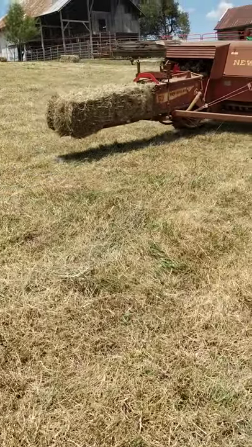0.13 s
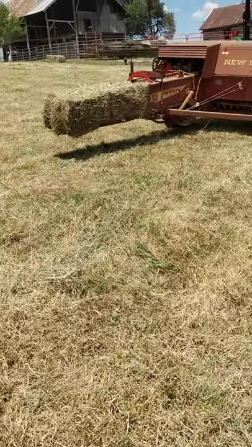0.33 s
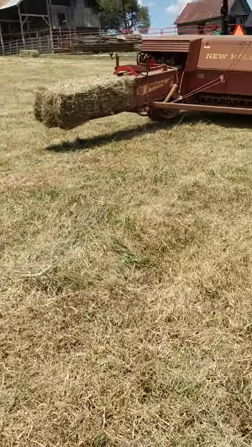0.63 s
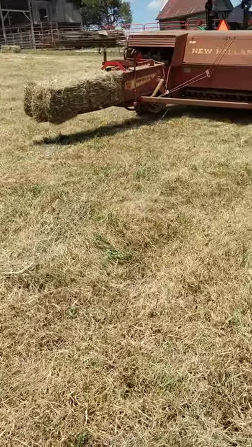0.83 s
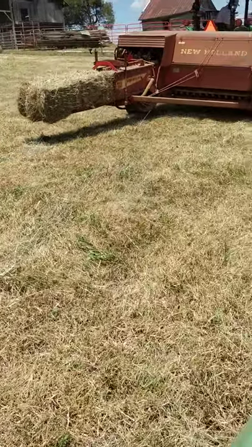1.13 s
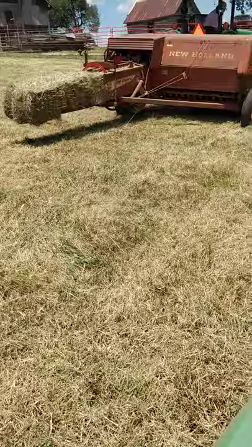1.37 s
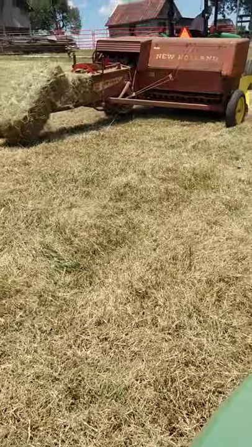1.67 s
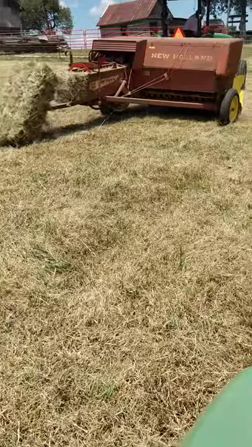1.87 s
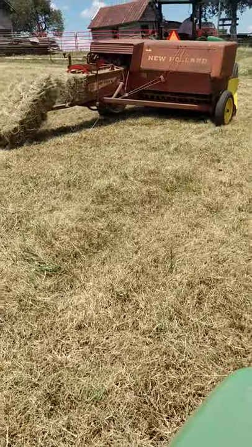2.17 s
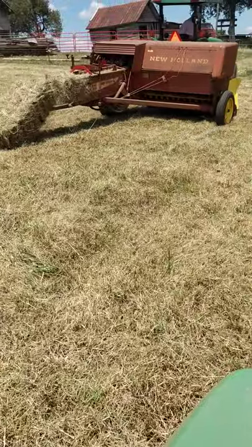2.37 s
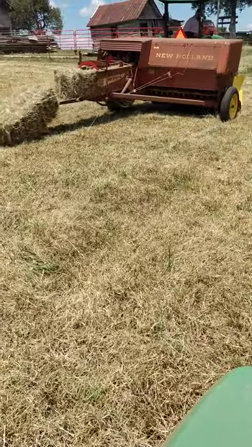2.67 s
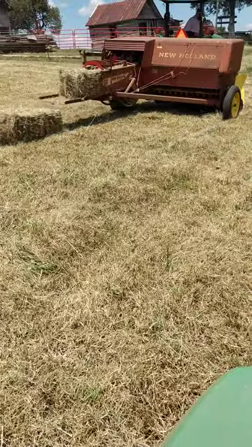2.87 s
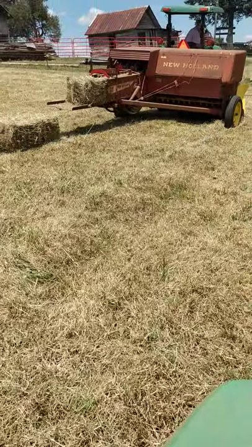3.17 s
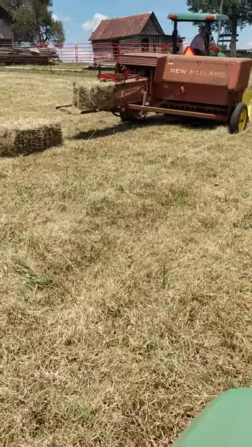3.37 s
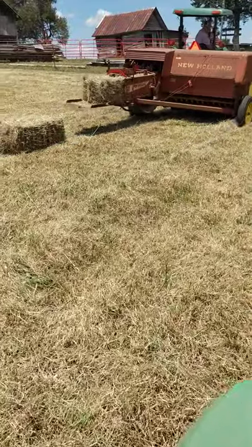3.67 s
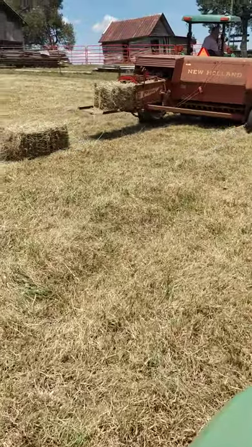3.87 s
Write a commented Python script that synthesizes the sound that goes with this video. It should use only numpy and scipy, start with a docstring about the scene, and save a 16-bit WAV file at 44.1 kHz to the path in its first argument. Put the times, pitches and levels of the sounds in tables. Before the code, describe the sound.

Farm machinery hums and rumbles steadily outdoors as a tractor runs a baler. Nearby metal parts jingle irregularly on the right, growing louder toward the end, when a panel thumps and a low throb swells.

```python
"""A hay field, where a tractor and baler drone: turning shafts hum and the bodywork rumbles.
Close on the right, each jolt makes loose metal parts click together and ring. A baler part pings,
a few hollow knocks sound, a body panel thumps and bounces, and a low throb swells at the end.
Behind it all lies a soft wash of distant machinery and air."""
import sys
import numpy as np
from scipy import signal
from scipy.fft import rfft, irfft
from scipy.io import wavfile
from scipy.ndimage import uniform_filter1d

SR = 44100
rng = np.random.default_rng(int(sys.argv[2]) if len(sys.argv) > 2 else 0)


def to_wav(s):
    """Save 16-bit WAV."""
    ch = np.atleast_2d(s).T  # columns
    pcm = np.round(np.clip(ch, -1, 1) * 32767)  # PCM
    wavfile.write(sys.argv[1], SR, pcm.astype(np.int16))


N = 176400  # 4 seconds

# Tones of the slow and the fast shaft: multiple_of_turn_rate, level_db
SLOW_SHAFT_TONES = [(3, -53.5), (4, -47), (9, -50), (12, -49)]
FAST_SHAFT_TONES = [(4, -49.5), (5, -48.5)]
# Which side those tones lean to: pitch_hz, left_minus_right_db
ENGINE_SIDE = [(60, 4.5), (110, -9), (200, -23.5)]
# How hard the bodywork shakes: time_s, relative_level_db
SHAKE_LEVELS = [(0, -32), (.12, -28), (.33, -32), (.56, -25), (.7, -28), (.97, -37), (1.04, -28),
                (1.17, -34), (1.45, -33), (1.63, -26), (1.78, -45), (2.62, -47), (2.7, -26), (2.77, -43),
                (3.7, -44), (3.78, -36), (4, -46)]
# Where the bodywork rings: pitch_hz, width_hz, relative_level_db
BODY_TONES = [(146.8, 78, -5.5), (201.5, 51, -0.5), (281.6, 79, -12.5)]
# Jolts that rattle the metal: start_s, strength_db, main_pitch_hz, fade_s, spread_octaves
JOLTS = [(0.059, -33, 5350, 0.015, 0.89), (0.086, -34.5, 4490, 0.024, 0.72),
         (0.176, -37.5, 6600, 0.021, 1.6), (0.3914, -31, 3816, 0.018, 1.5), (0.4133, -28, 3630, 0.024, 1.2),
         (0.552, -23.5, 9100, 0.018, 1.07), (1.409, -30, 4730, 0.06, 1.1), (1.42, -24.5, 8400, 0.018, 1.9),
         (1.505, -32.5, 8060, 0.0049, 1.2), (1.622, -37, 4475, 0.0093, 1.7),
         (1.721, -36.5, 5480, 0.02, 0.33), (1.816, -32.5, 4884, 0.023, 1.2),
         (1.9035, -35.5, 3600, 0.031, 1.3), (2.139, -33.5, 3594, 0.024, 1.15),
         (2.189, -34.5, 5050, 0.016, 1.5), (2.2953, -25, 5610, 0.018, 0.8),
         (2.3308, -13.5, 6890, 0.033, 1.27), (2.444, -22.5, 5760, 0.032, 1.21),
         (2.5388, -33.5, 4826, 0.069, 0.99), (2.6785, -23.5, 4944, 0.03, 0.83),
         (2.7329, -40, 4400, 0.0075, 0.65), (2.8, -31.5, 2650, 0.012, 1.3),
         (3.0408, -34.5, 6580, 0.025, 0.95), (3.1657, -27.5, 8260, 0.024, 0.51),
         (3.2544, -10, 8440, 0.012, 1.62), (3.302, -23.5, 5800, 0.015, 0.88),
         (3.3607, -17.5, 4150, 0.012, 1.7), (3.483, -31, 7010, 0.12, 1.7), (3.519, -22, 9360, 0.018, 1.7),
         (3.5613, -14, 4440, 0.019, 1.6), (3.5913, -12.5, 3300, 0.017, 1.3),
         (3.6605, -22.5, 2460, 0.02, 1.64), (3.738, -20, 2585, 0.018, 0.76),
         (3.776, -30.5, 5280, 0.012, 1.3), (3.8346, -29.5, 7600, 0.027, 1.44),
         (3.866, -36.5, 2444, 0.0094, 0.85), (3.9092, -31, 3470, 0.031, 1.7),
         (3.958, -29, 4960, 0.03, 0.85)]
# Main tones of the loose metal: pitch_hz, relative_level_db
METAL_TONES = [(2340, 0), (3390, -15), (4440, 2.5), (4840, -0.5), (6100, 3), (9640, 5.5)]
# How much weaker the rattle is on the left: pitch_hz, left_minus_right_db
RATTLE_SIDE = [(1000, -20), (4000, -18.5), (14000, -26.5)]
# Pings of the baler part: start_s, relative_level_db
PING_HITS = [(1.531, -40.5), (1.7982, -42), (1.9315, -30), (2.0652, -44), (2.4536, -33), (2.584, -32.5),
             (2.7245, -37), (2.8482, -35.5), (2.98, -32), (3.9877, -34)]
# The two tones of a ping: rough_pitch_hz, relative_level_db, ring_s
PING_TONES = [(1742, -8.5, 0.22), (1761, 1, 0.11)]
# Hollow knocks, and at 3.27 s the low thud of the panel hit: start_s, level_db, pitch_hz
KNOCK_HITS = [(0.567, -41, 985), (0.819, -45, 980), (1.348, -43.5, 1094), (2.4, -42.5, 1384),
              (3.27, -17, 330), (3.505, -34.5, 434), (3.75, -40, 777)]
# The hit on the panel and its bounces: start_s, level_db, ring_s
PANEL_HITS = [(3.245, -20, 0.36), (3.268, -18, 0.27), (3.312, -24.5, 0.22), (3.366, -26, 0.13)]
# Tone colour of the panel: pitch_hz, relative_level_db
PANEL_COLOUR = [(100, -55), (145, -13), (299, -6), (618, -17.5), (744, -12.5), (1190, -22), (3000, -21.5),
                (5000, -43)]
# Course of the throb: time_s, pulse_rate_hz, level_db
THROB_COURSE = [(3.52, 23.13, -37), (3.68, 29.3, -29.5), (3.8, 33.74, -16), (3.9, 33.1, -27.5),
                (4, 34, -29)]
# Tones of the throb: multiple_of_pulse_rate, relative_level_db
THROB_TONES = [(2, 8.5), (3, 4.5), (4, -0.5)]
# Tone colour of the distant wash: pitch_hz, relative_level_db
WASH_COLOUR = [(15, -42), (25, -14.5), (212, -5.5), (373, -14), (800, -21.5), (1260, -23), (1650, -24.5),
               (11600, -36), (13600, -38.5), (16000, -85)]
# How much weaker the wash is on the left: pitch_hz, left_minus_right_db
WASH_SIDE = [(60, -34), (240, -2), (950, -5), (3770, -11.5), (15000, -18)]
# How alike the wash is in both ears: pitch_hz, likeness_0_to_1
WASH_LIKENESS = [(60, 0.82), (380, 0.87), (2380, 0.0052), (15000, 0.02)]


def engines():
    """Two turning shafts hum at multiples of their turn rates, wavering a little in speed and level."""
    out = np.zeros((2, N))
    for turn_hz, tones in ((17.13, SLOW_SHAFT_TONES), (22.54, FAST_SHAFT_TONES)):
        turns = np.cumsum(turn_hz * (1 + 0.0048 * drift(top_hz=1.378))) / SR
        for multiple, db in tones:
            level = np.sqrt(2) * amp(db + 2 * drift(top_hz=7.8))
            tone = level * np.sin(2 * np.pi * (multiple * turns + rng.random()))
            out += panned(tone, at_pitch(ENGINE_SIDE, multiple * turn_hz))
    return out


def bodywork_rumble():
    """Lumpy shaking makes the bodywork ring at low pitches, and carries the engine's hum."""
    hum_hz, hum_db = 204.8, -2.5
    t, body = np.arange(N) / SR, 0
    shaking = rng.standard_normal(N) * amp(1.2 * drift(top_hz=44))
    for hz, width_hz, db in BODY_TONES:
        spin, decay = np.exp(2j * np.pi * hz * t), np.exp(-np.pi * width_hz / SR)
        band = spin * signal.lfilter([1], np.poly([decay] * 3), shaking / spin)  # keeps what is near hz
        body += amp(db) * evened(band.real)
    hum = amp(hum_db) * np.sin(2 * np.pi * hum_hz * t)
    return amp(over_time(SHAKE_LEVELS, 1)) * (evened(body) + hum)


def metal_rattles():
    """Each jolt sets off clicks that ring loose parts; harder jolts click more and crack more sharply."""
    rise_s, small_count, small_db = 0.009, 130, -8.5
    small_hz = np.geomspace(1250, 15500, small_count) * rng.uniform(0.9, 1.02, small_count)
    hz, db = np.transpose(METAL_TONES + [(f, small_db) for f in small_hz])
    rings = ring(hz[:, None], ring_s=0.045, size=4096) * fade_in(0.004, 4096)
    out, size = np.zeros(N), 8192
    t, noise_hz = np.arange(size) / SR, np.fft.rfftfreq(size, 1 / SR) + 1
    for start_s, strength_db, main_hz, fade_s, octaves in JOLTS:
        scatter_db = (4 - 0.3 * strength_db) * rng.standard_normal((4, len(hz)))  # four different parts
        chance, push, noise, part_choice = rng.random((4, size))
        shape = fade_in(rise_s, size) * np.exp(-(t / fade_s) ** 0.83)
        clicks_per_s = 2400 * amp(0.3 * strength_db)
        clicks = shape * (chance < clicks_per_s / SR) * (push - 0.5)
        clicks[round(rise_s * SR / 2)] += 0.3  # the jolt itself
        main_ring = amp(-21.5 - 0.7 * strength_db) * evened(ring(main_hz, ring_s=0.045, size=4096))
        ringing = 0
        for k, part_db in enumerate(scatter_db):
            part = evened((amp(db + part_db) * nearness(hz, main_hz, octaves)) @ rings) + main_ring
            ringing += signal.fftconvolve(clicks * ((part_choice * 4).astype(int) == k), part)[:size]
        bursts = (noise - 0.5) * uniform_filter1d(abs(clicks), 150)
        crack = irfft(rfft(bursts) * nearness(noise_hz, main_hz, octaves), size)
        sound = evened(ringing) + amp(3 + 0.7 * strength_db) * evened(crack)
        add(out, start_s - rise_s / 2, amp(strength_db) * sound / abs(sound).max())
    return out + tinkles(out, rings[hz > 2000][::3] * fade_in(rise_s, 4096))


def tinkles(rattling, rings, hits_per_s=140):
    """Tiny hits ring the metal all the time, louder just after a rattle."""
    recent = evened(abs(uniform_filter1d(abs(rattling), 8000, origin=3500))) ** 0.36
    strength = (0.97 + recent) * amp(-53.5 + 3.13 * np.minimum(rng.exponential(1, N), 4))
    hits = strength * (rng.random(N) < hits_per_s / SR)
    choice = rng.integers(0, len(rings), N)
    return sum(signal.oaconvolve(hits * (choice == k), tone)[:N] for k, tone in enumerate(rings))


def baler_pings():
    """A baler part rings with two tones so close that they wobble against each other."""
    out = np.zeros((2, N))
    for start_s, level_db in PING_HITS:
        pair = sum(amp(db) * ring(hz * rng.uniform(0.96, 1.003), ring_s, size=8000)
                   for hz, db, ring_s in PING_TONES)
        add(out, start_s, panned(amp(level_db - 7.5) * fade_in(0.0023, 8000) * pair, left_db=5))
    return out


def hollow_knocks():
    """Each knock rings one short tone, a little to the right."""
    out = np.zeros((2, N))
    for start_s, db, hz in KNOCK_HITS:
        knock = amp(db) * fade_in(0.0023, 8000) * ring(hz, ring_s=0.14, size=8000)
        add(out, start_s, panned(knock, left_db=-8))
    return out


def panel_thump():
    """A body panel is struck and bounces, each time with a dull burst of noise."""
    out, size = np.zeros((2, N)), 12000
    t = np.arange(size) / SR
    for start_s, db, ring_s in PANEL_HITS:
        shared, right_only = rng.standard_normal((2, size))
        sides = np.array([evened(colour(x, PANEL_COLOUR)) for x in (shared, shared + 1.4 * right_only)])
        shape = fade_in(0.01, size) * amp(db - 60 * t / ring_s)
        add(out, start_s, panned(sides * shape, left_db=-4))
    return out


def low_throb():
    """Rough, low tones pulse together, speeding up as they swell."""
    pulses = np.cumsum(over_time(THROB_COURSE, 1)) / SR
    tones = sum(amp(db) * (1 + 0.44 * drift(top_hz=25)) * np.cos(2 * np.pi * multiple * pulses)
                for multiple, db in THROB_TONES)
    opening = np.clip((np.arange(N) / SR - THROB_COURSE[0][0]) / 0.066, 0, 1)
    return evened(tones) * amp(over_time(THROB_COURSE, 2)) * opening


def distant_wash(level_db=-45):
    """Far machinery and air blend into noise with drifting louder and softer patches."""
    frames, hz = N // 256 + 5, np.fft.rfftfreq(1024, 1 / SR)[:, None]
    noise = rng.standard_normal((frames, 513, 5)).T
    patches_db = 1.78 * evened(uniform_filter1d(uniform_filter1d(noise[4], 12, 0), 10, 1))
    treble_flicker_db = 0.5 * np.resize(drift(top_hz=15)[::256], frames) * np.clip(hz / 1500, 0, 1)
    left, unrelated = noise[0] + 1j * noise[1], noise[2] + 1j * noise[3]
    likeness = at_pitch(WASH_LIKENESS, hz)
    right = likeness * left + np.sqrt(1 - likeness ** 2) * unrelated
    sides = np.array([left * amp(at_pitch(WASH_SIDE, hz)), right])
    sides *= amp(at_pitch(WASH_COLOUR, hz) + patches_db + treble_flicker_db)
    return amp(level_db) * evened(signal.istft(sides, nperseg=1024, noverlap=768)[1][:, :N])


def close_on_right(sound, echo_s=0.22, delay_samples=5):
    """A sound on the right reaches the left ear weaker and later, with short echoes on both sides."""
    echo = rng.standard_normal((2, 9000)) * amp(-60 * np.arange(9000) / SR / echo_s)
    echoes = signal.fftconvolve(sound[None], echo / np.linalg.norm(echo[0]), axes=1)[:, :N]
    left, right = 2.303 * (sound + amp([[-5.5], [-13]]) * echoes)
    return np.array([np.roll(colour(left, RATTLE_SIDE), delay_samples), right])


def nearness(hz, main_hz, spread_octaves, top_hz=13200):
    """Favours pitches near the main one and softens the highest."""
    distance = abs(np.log2(hz / main_hz) / spread_octaves)
    return np.exp(-np.where(hz > main_hz, 0.5 * distance ** 2, distance ** 4)) / (1 + (hz / top_hz) ** 4)


def ring(hz, ring_s, size):
    """A tone that fades by 60 dB in ring_s."""
    t = np.arange(size) / SR
    return amp(-60 * t / ring_s) * np.sin(2 * np.pi * hz * t)


def drift(top_hz):
    """A smooth random wander, about 1 in size."""
    t = np.arange(0, N + 64, 64) / SR
    waves = sum(np.sin(2 * np.pi * (hz * t + rng.random())) / np.sqrt(hz)
                for hz in np.geomspace(0.3, top_hz, 20))
    return np.interp(np.arange(N) / SR, t, evened(waves))


def colour(x, table):
    """Turns each pitch up or down as the table says."""
    return irfft(rfft(x) * amp(at_pitch(table, np.fft.rfftfreq(len(x), 1 / SR))), len(x))


def evened(x):
    """Scales x to an average power of 1."""
    return x / np.sqrt(np.mean(x ** 2) + 1e-20)


def amp(db):
    return 10 ** (np.asarray(db) / 20)


def fade_in(rise_s, size):
    return np.minimum(np.arange(size) / (SR * rise_s), 1)


def panned(x, left_db):
    return amp([[left_db / 2], [-left_db / 2]]) * x


def at_pitch(table, hz):
    table_hz, values = np.transpose(table)
    return np.interp(np.log(hz + 1), np.log(table_hz + 1), values)


def over_time(table, column):
    rows = np.array(table)
    return np.interp(np.arange(N) / SR, rows[:, 0], rows[:, column])


def add(mix, start_s, sound):
    part = mix[..., round(start_s * SR):][..., :sound.shape[-1]]
    part += sound[..., :part.shape[-1]]


def scene():
    """The drone and the wash, with the shorter sounds on top."""
    steady = engines() + bodywork_rumble() + distant_wash()
    rattles = close_on_right(metal_rattles())
    return steady + rattles + baler_pings() + hollow_knocks() + panel_thump() + low_throb()


def record(dry):
    """Cuts the treble above 15900 Hz."""
    return signal.oaconvolve(dry, signal.firwin(511, 15900, window=("kaiser", 9), fs=SR)[None], "same")


dry = scene()
out = record(dry)
to_wav(out)
```